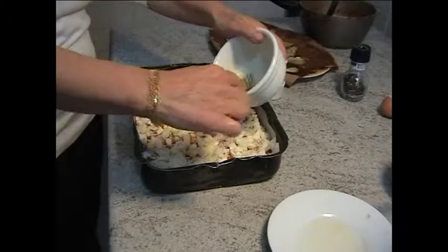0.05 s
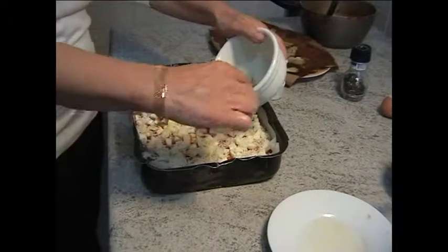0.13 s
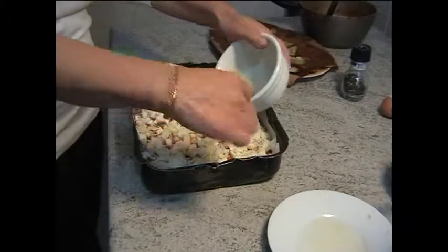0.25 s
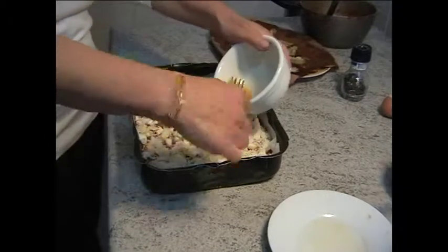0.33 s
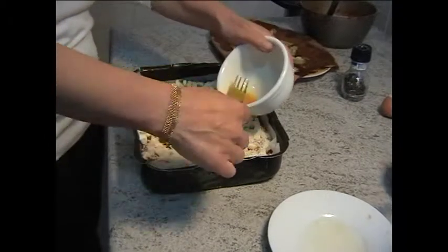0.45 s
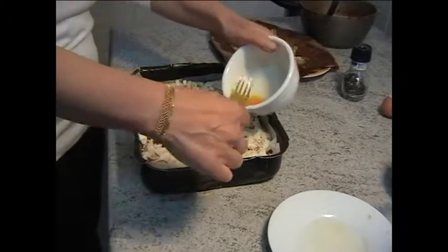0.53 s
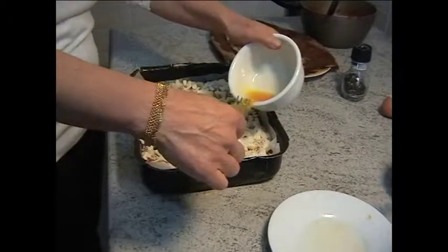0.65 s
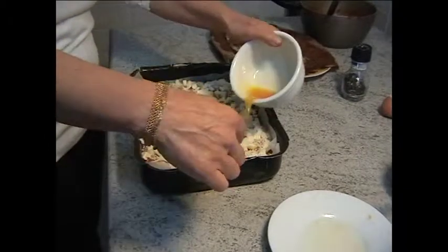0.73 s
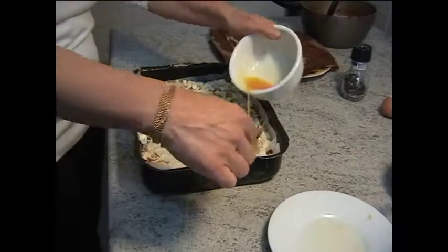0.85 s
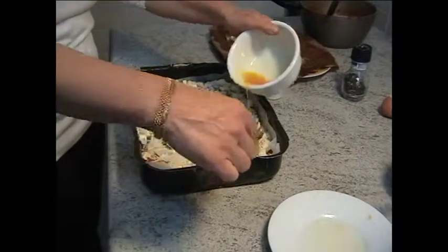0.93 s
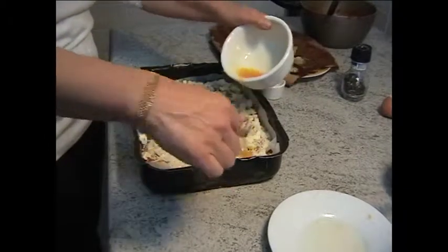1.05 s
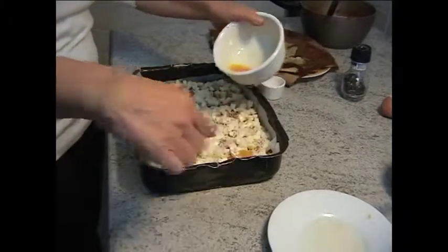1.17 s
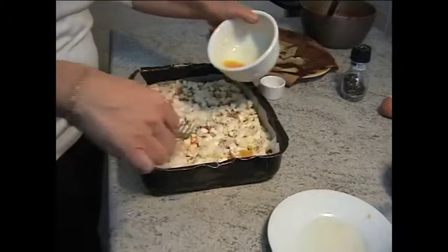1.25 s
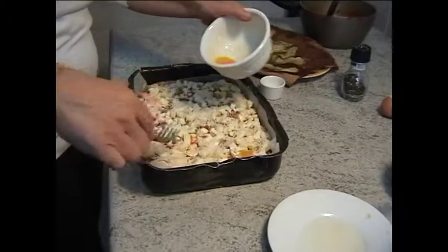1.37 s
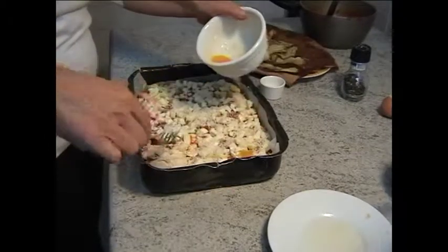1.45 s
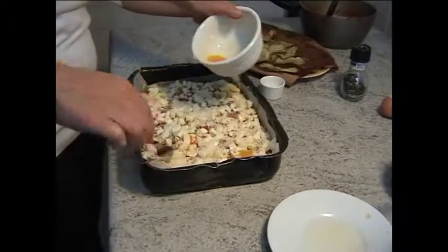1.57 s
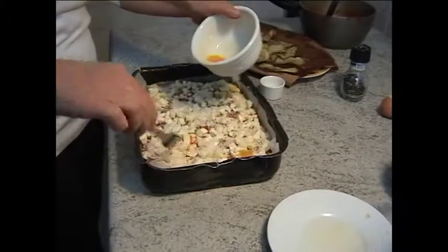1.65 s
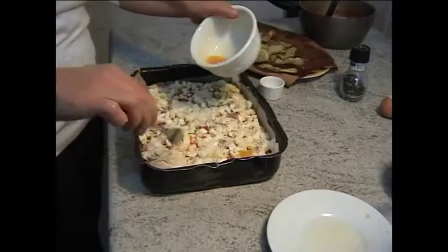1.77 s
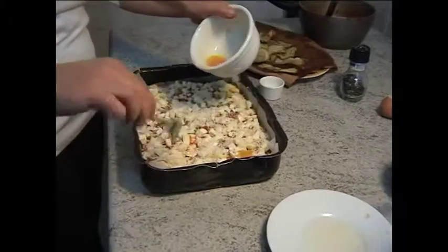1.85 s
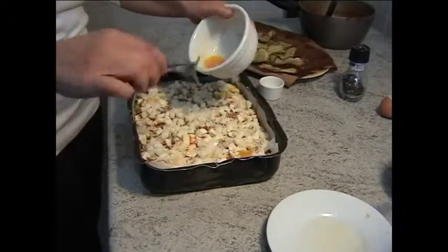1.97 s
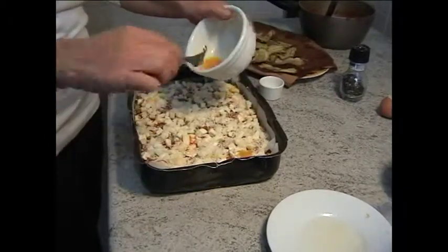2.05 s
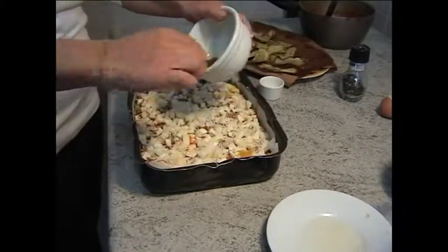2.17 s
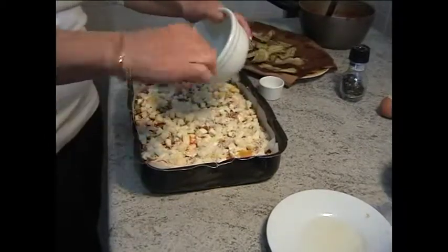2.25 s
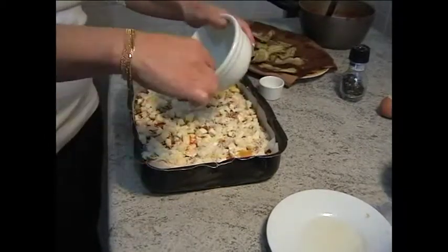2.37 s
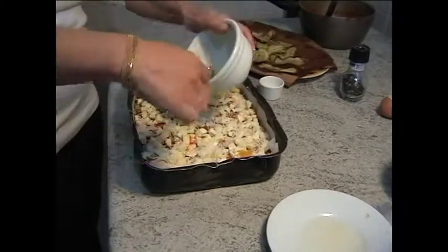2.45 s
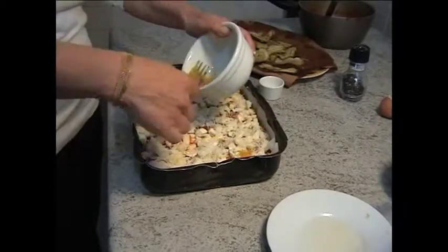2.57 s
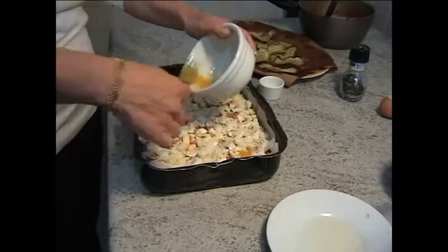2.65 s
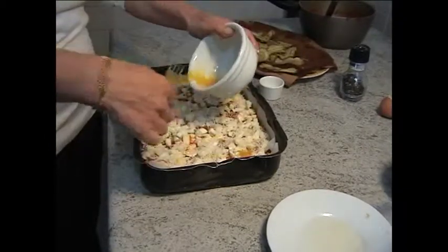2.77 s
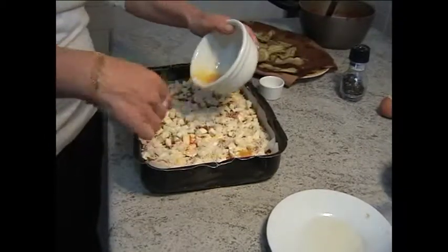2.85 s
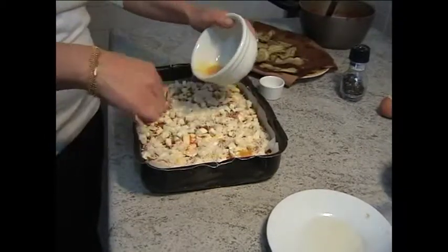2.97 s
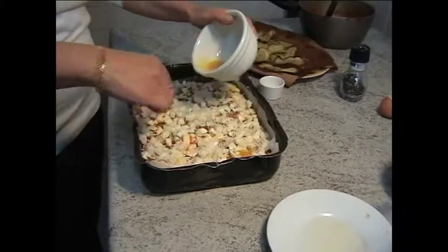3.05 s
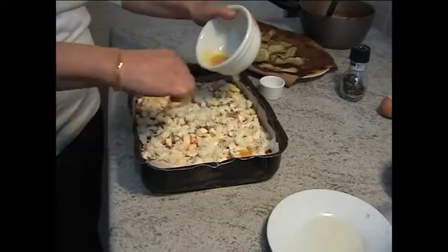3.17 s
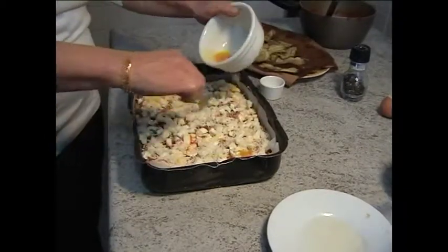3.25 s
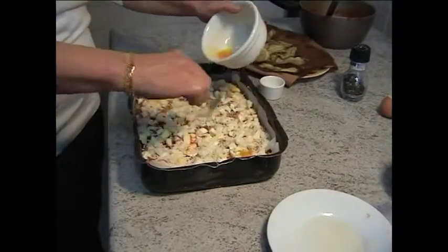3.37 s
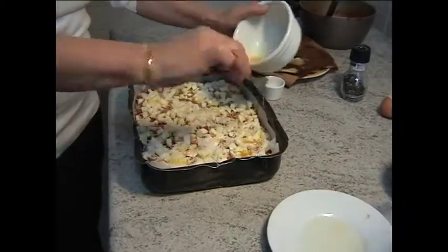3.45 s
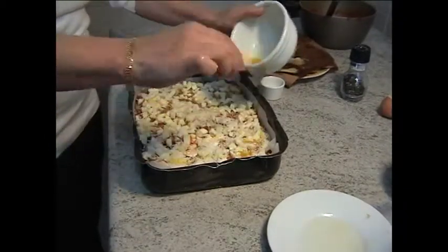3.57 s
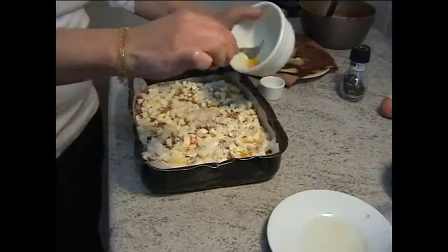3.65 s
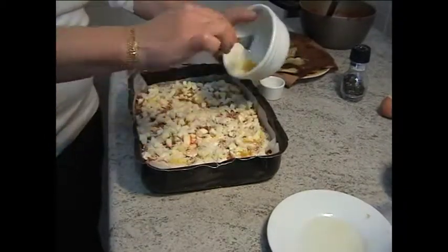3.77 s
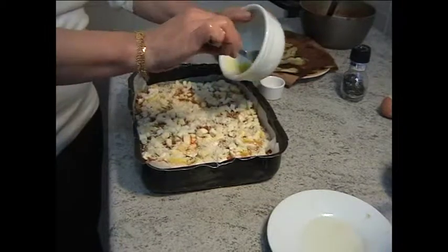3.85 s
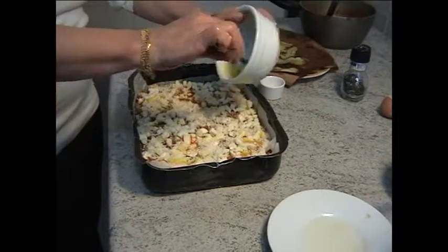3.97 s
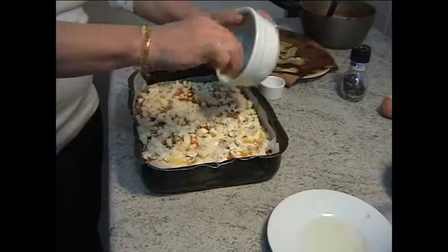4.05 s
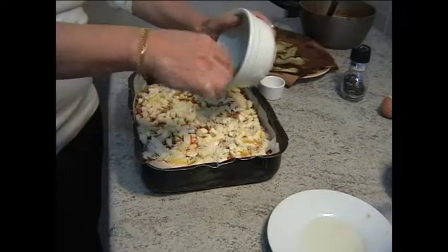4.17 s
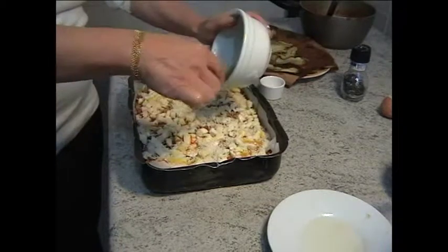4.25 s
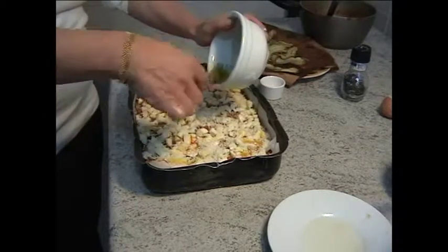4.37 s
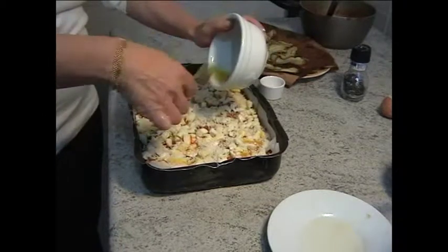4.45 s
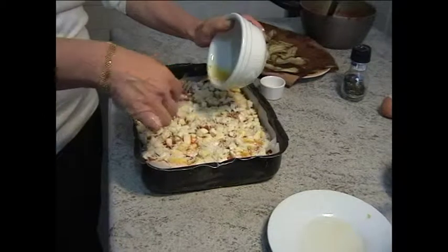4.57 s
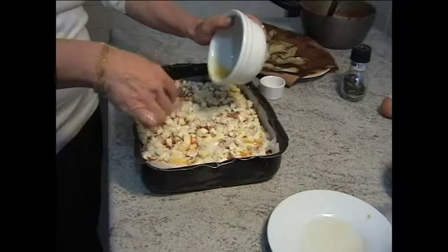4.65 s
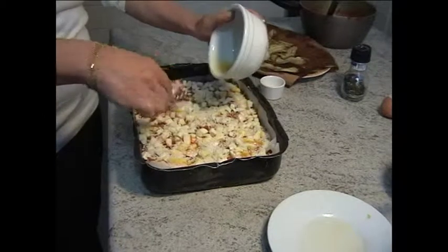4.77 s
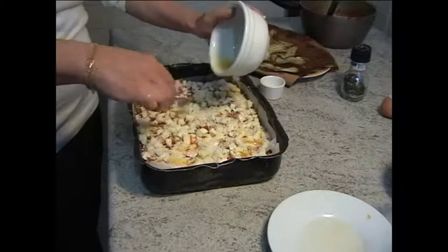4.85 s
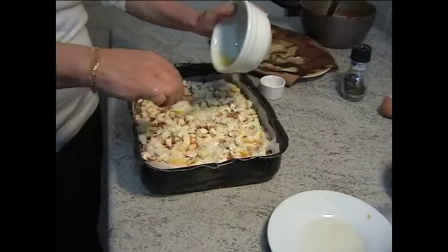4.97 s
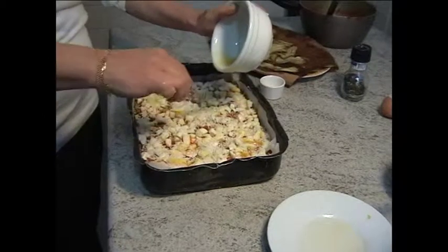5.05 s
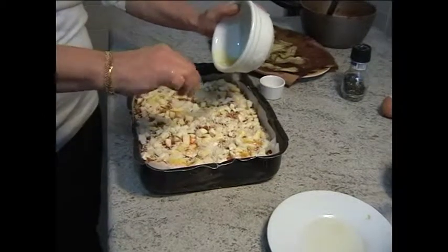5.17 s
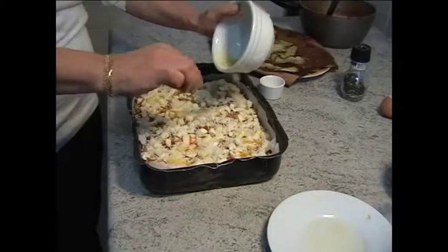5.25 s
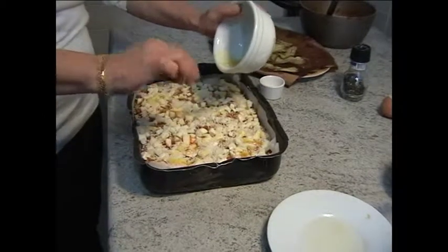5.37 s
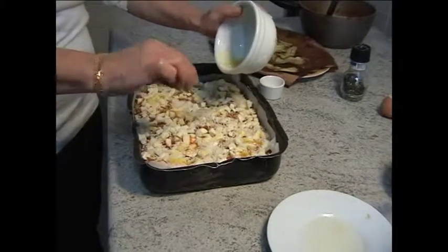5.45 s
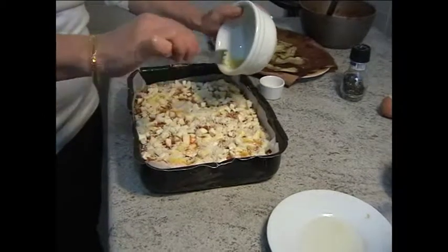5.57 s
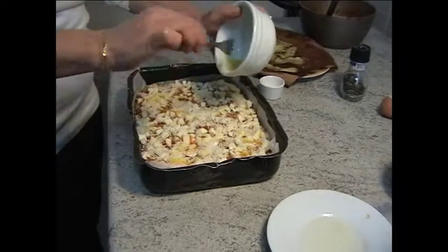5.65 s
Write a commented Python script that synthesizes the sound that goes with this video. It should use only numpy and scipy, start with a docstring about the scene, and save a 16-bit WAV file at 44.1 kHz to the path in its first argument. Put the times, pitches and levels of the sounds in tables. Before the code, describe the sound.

Over a steady fan hum, fork tines scratch, squeak and knock brightly against a hand-held ceramic bowl, with pauses between the bursts.

```python
"""An appliance hums throughout: steady and wavering tones, shaped noise for its fan, a faint high whine.
Over it a steel fork works beaten egg out of a small hand-held ceramic bowl, in three bouts. From the start
the tines scrape (many tiny slips ring the bowl) and squeak (short gliding tones); soon the fork knocks the
bowl (fading modes and a noisy crack). In the second bout egg slops too (narrow puffs of noise).
A small kitchen echoes the bowl by convolution; the level dips briefly once before the third bout."""
import sys
import numpy as np
from scipy import signal
from scipy.fft import rfft, irfft, next_fast_len
from scipy.io import wavfile
from scipy.ndimage import uniform_filter1d, map_coordinates

SR = 44100
rng = np.random.default_rng(int(sys.argv[2]) if len(sys.argv) > 2 else 0)


def generate_wav(signal):
    """Clip the signal to [-1, 1] and save it as 16-bit WAV at the path in sys.argv[1]."""
    frames = np.transpose(np.atleast_2d(signal))
    scaled = np.clip(frames, -1, 1) * 32767
    pcm = np.round(scaled).astype(np.int16)
    wavfile.write(sys.argv[1], SR, pcm)


N = 251811

# Levels here come before the echoes and the microphone.
# Tones of the appliance: pitch_hz, level_db (rms), waver_share (0-1)
HUM_TONES = [(99.95, -49, 0.01), (130.2, -58.5, 0.06), (200.2, -56.5, 0.13), (230.3, -54.5, 0.14),
             (331.3, -62.5, 0), (390.5, -67.5, 0.2), (418, -72.5, 0.3), (478, -72.5, 0.8), (488, -66.5, 0),
             (529, -71, 0.4), (806, -75, 1), (1140, -73, 0.95)]
# Rushing air of the fan: pitch_hz, relative_level_db
AIR_SPECTRUM = [(330, -24.5), (560, 1.5), (795, 1), (902, -2), (1150, 1.5), (1520, -3.5), (1980, -5.5),
                (2370, -8), (11600, -25), (12400, -32.5), (16000, -43)]
# Low rumble of the fan: pitch_hz, relative_level_db
RUMBLE_SPECTRUM = [(20, -31), (45, -2), (80, 5.5), (130, 9), (165, 6.5), (240, 17.5), (300, 7.5),
                   (500, 13.5), (600, -18), (900, -23.5)]
# How alike the fan noise is on left and right: pitch_hz, likeness (0-1)
AIR_LIKENESS = [(60, 1), (150, 1.0), (380, 0.98), (950, 0.84), (2380, 0.74), (5980, 0.27), (15000, 0.21)]
# Strong modes of bowl and fork together: pitch_hz, relative_level_db,
# fade_s (time to fall 60 dB, before the hold of a contact scales it)
BOWL_MODES = [(1346, 1, 0.0027), (1855, -9.5, 0.041), (1928, -7, 0.049), (2029, -10.5, 0.2),
              (2135, -6, 0.11), (2412, -12, 0.068), (2669, -10.5, 0.07), (2840, -20.5, .04),
              (4600, -15, 0.091), (4820, -16.5, 0.16), (5198, -4, 0.23), (5254, -2.5, 0.24),
              (5390, -10, 0.075), (5754, -9.5, 0.048), (6290, -16.5, 0.027), (7470, -15, 0.028),
              (7770, -13, 0.13), (8090, -21.5, 0.094), (8780, -14, .1), (9460, -8, 0.089),
              (9400, -10, 0.088), (10200, -10.5, .11), (10500, -9.5, 0.064), (11700, -9, 0.054)]
# Many short-lived modes crowd round the strong ones: pitch_hz, relative_level_db
CRACK_SPECTRUM = [(400, -22), (850, 5), (1300, 0), (1600, -5.5), (2050, -1.5), (2600, -2.5), (3350, -9),
                  (4200, -4), (4700, -2), (5300, 6), (6600, -4), (9000, -2), (12000, -13), (16000, -8.5)]
# The tines drag over the glaze, one row a stroke: peak_s (most pressure), length_s, level_db,
# lowest_hz (lowest pitch driven), brightness_db (per octave), favoured_hz, favour_db,
# favour_width (share of that pitch), harsh_db
STROKES = [ (0, 0.13, -45, 2430, -2, 8800, 5, 0.065, 4), (0.16, 0.14, -61, 1710, -14, 2870, 17, .07, 10),
           (0.227, 0.058, -54, 2400, -14, 5300, -11, .07, -4),
           (0.265, 0.096, -49, 1660, 10, 1990, 22, 0.077, 5),
           (0.324, 0.19, -54.5, 1500, 6, 3600, 10, 0.23, 13),
           (0.361, 0.056, -45, 1450, -10, 3700, 15, 0.13, 6),
           (0.44, 0.051, -45, 1400, -15, 2120, 10, .16, 12), (0.514, 0.1, -54, 1700, 4, 2000, 7, .1, 2),
           (0.611, 0.082, -40.5, 2040, -6.5, 2140, 0, 0.18, -1),
           (2.232, 0.12, -42.5, 1900, 0, 4200, 3, .3, 10.5),
           (2.343, 0.19, -43, 1900, -2, 3000, 0, 0.34, 9.5),
           (2.489, 0.21, -46, 1790, -2.5, 2420, 2, .25, 4), (2.621, 0.2, -53.5, 1990, 3.5, 2800, 6, .2, 8),
           (2.721, 0.066, -51.5, 1900, -1.5, 2200, 8, .2, 1), (2.737, 0.083, -43, 1895, 2, 1910, 18, .1, 7),
           (2.76, 0.053, -43, 1950, 4, 2100, -1, 0.27, 0), (2.77, .035, -42, 3780, -34, 5170, -1, 0.088, 8),
           (3.941, 0.13, -37, 3000, 5.5, 5300, 5.5, .09, 2),
           (4.118, 0.14, -44.5, 2980, 1.5, 5590, 19, 0.063, -8),
           (4.217, 0.063, -42, 3800, -4, 5830, 18, 0.057, -12),
           (4.251, 0.15, -52, 2000, 1, 1960, 10, 0.076, -1),
           (4.364, .03, -45.5, 3000, -1, 3900, 8, 0.071, 9),
           (4.365, 0.14, -48.5, 2330, 3.5, 9500, 2.5, .07, 2),
           (4.471, 0.14, -45.5, 1900, 8, 2240, 17, .1, 2), (4.501, 0.029, -37, 3600, 0, 6960, 12, .06, -2),
           (4.533, 0.063, -43, 3400, -6, 5200, 8, 0.11, -5),
           (4.536, 0.063, -44.5, 2290, 6, 8300, 0, .05, 3)]
# The film of egg softens each slip: pitch_hz, gain_db
WET_FILM = [(500, 7.5), (9500, -3), (12500, -4.5), (16000, -7)]
# A tine sings on the glaze, one row a squeak: start_s, length_s, pitch_hz, level_db,
# glide (share by which the pitch rises), roughness (0 is smooth, about 1 is very rough)
SQUEAKS = [ (0, 0.044, 2144, -56, -0.015, 0.4), (.005, .054, 3350, -59, -0.014, 0),
           (0.257, 0.02, 1880, -54, -0.069, 1), (.302, 0.071, 3110, -58.5, -0.021, .9),
           (0.583, 0.055, 2830, -50, 0.036, 0.8), (.585, 0.052, 2154, -49, -0.016, .4),
           (2.317, 0.01, 2650, -36, 0.048, .8), (2.319, 0.053, 2072, -46, 0, 0.8),
           (2.343, 0.042, 2750, -58, 0.059, 1), (2.431, 0.025, 2800, -50, -0.0036, .8),
           (2.477, 0.012, 2500, -57, .02, .8), (2.519, .032, 2200, -54, 0.036, .8),
           (2.57, .018, 2320, -56, 0.028, .8), (2.573, 0.11, 1895, -64.5, -0.061, 0.7),
           (2.582, 0.045, 3000, -64, 0.022, 1.16), (2.621, 0.027, 2850, -56.5, -0.03, .9),
           (2.652, 0.076, 2815, -62.5, -0.02, .8), (2.753, 0.021, 2096, -47, 0.0057, .8),
           (4.08, 0.086, 3920, -61, 0.000097, 0.45), (4.127, 0.025, 5360, -45, 0.013, .9),
           (4.195, 0.022, 6380, -48.5, -.02, .5), (4.207, 0.038, 1936, -59, -.02, 0.7),
           (4.236, 0.072, 2010, -51.5, 0.012, 0), (4.33, 0.055, 1946, -53.5, -0.078, 0.65),
           (4.47, 0.031, 1975, -43.5, -0.022, .4), (4.52, 0.042, 2000, -57, 0.054, 0.8),
           (4.526, 0.015, 5060, -47, 0.035, .9), (4.53, 0.023, 8650, -47, -.02, 1.1)]
# How long the kitchen's tail lasts: pitch_hz, fade_s (time to fall 60 dB)
KITCHEN_FADE = [(500, 0.33), (2000, 0.59), (5000, 0.4), (9000, 0.35), (15000, 0.26)]
# How alike the echoes are on left and right: pitch_hz, likeness (0-1)
ECHO_LIKENESS = [(500, 0.95), (2000, 0.93), (5000, 0.2), (9000, 0.49), (15000, .3)]
# The fork knocks the bowl, one row a knock: start_s, level_db, lowest_hz (lowest pitch driven),
# brightness_db (per octave), favoured_hz, favour_db, favour_width (share of that pitch), harsh_db,
# hold (factor on the ring time: low when the fork stays pressed on)
CLINKS = [ (0.107, -55.5, 3200, -5, 10800, 11, .07, 7, 0.52),
          (0.2333, -34, 2110, -6.5, 4050, 13.5, 0.054, 3.5, 0.19),
          (.285, -32.5, 2020, -6.5, 2590, 9, 0.052, -1, 0.14),
          (0.3186, -47, 3000, -9, 5300, 7, 0.12, -6, 0.17),
          (0.3579, -51, 1300, -20, 1600, 23, 0.18, 8, 0.26), (.424, -40, 1700, -5, 2280, 3, 0.095, -1, 0.2),
          (.4495, -50, 1720, -8, 2070, 19, 0.083, -5, .25),
          (0.4719, -34, 1400, -8.5, 1710, 7, 0.38, 4, 0.22),
          (0.576, -33.5, 2100, -4.5, 7580, 11, 0.043, 1, 0.34),
          (.591, -50, 3400, -4, 5940, 18, .07, -3, 0.18),
          (0.7308, -34.5, 3380, 2, 7500, 9.5, 0.066, 7, 0.57),
          (2.204, -20, 1750, 1.5, 6500, 6.5, 0.12, 7.5, 1),
          (2.305, -22.5, 2400, -3, 9550, 13, 0.037, -3.5, 0.13),
          (2.311, -32.5, 2100, -4, 2780, 12, 0.38, -4, 0.14),
          (2.322, -40, 2300, -6, 3400, -2, .3, -10, .15), (2.374, -32, 2300, 0.5, 6700, 11, .1, 8, 0.79),
          (2.381, -38.5, 1400, -10, 1700, 20, 0.17, -3, 0.45),
          (2.394, -46, 3400, -6, 5200, 6, .08, -2, 0.17), (2.407, -51, 3000, -6, 5200, -3, .08, -2, 0.23),
          (2.43, -29.5, 2100, 1, 4900, 6, 0.025, 8.5, 0.47), (2.467, -43, 2800, -4, 5100, 6, .08, 2, .18),
          (2.505, -52, 3000, -5, 5200, 5, .08, -3, .18), (2.758, -50, 3210, -2, 5700, 6, .1, 7, 0.14),
          (2.767, -47.5, 3200, -3, 5600, -1, .1, -5, .15), (2.779, -43.5, 2400, 5, 5200, 2.5, .07, 2, 0.42),
          (3.9153, -19, 2010, -3, 7680, 11.5, 0.043, -6, 0.4),
          (3.961, -32.5, 2600, -10, 5170, 9.5, .07, -10, 0.38),
          (3.971, -33, 3800, -11, 5200, 12, .07, -16, 0.3),
          (3.9955, -31.5, 3200, 5.5, 5220, 19, 0.066, 8, 0.29),
          (4.0408, -36, 3550, -1, 5500, 10, 0.085, 0, 0.18),
          (4.201, -46.5, 3900, -24, 5700, -1, .1, -14, 0.34),
          (4.362, -51, 1980, 10, 3860, 15, .08, 3, 0.62), (4.44, -32.5, 2110, -8, 1880, 5, 0.057, -6, 0.39),
          (4.459, -43, 2206, -13, 5200, 6, .07, -1, 0.39), (4.537, -50, 3400, 2, 5300, 4, .1, -4, 0.17)]
# The fork meets the bowl at another place in each bout, so its middle modes change: time_s, gain_db
MIDDLE_LEVEL = [(.7, 1), (2.2, 0.5), (2.8, -1.5), (3.9, -4)]
# The egg slops under the fork: start_s, length_s, pitch_hz, level_db
SLOPS = [(2.314, 0.032, 532, -56), (2.315, 0.03, 830, -55.5), (2.361, 0.062, 758, -60.5)]
# The two microphone ports: pitch_hz, left_minus_right_db
PORT_BALANCE = [(500, -2), (2200, 0), (5200, -0.2), (9000, 1), (13000, 1)]
# Colour of the microphone: pitch_hz, gain_db
MICROPHONE = [(20, 2.5), (11500, 0), (12600, 0), (13600, -5), (16000, -20)]
# The brief dip in level: start_s, end_s
DIP = (3.4427, 3.4597)

AIR_DB = -60.5
# A tine chatters longer after a harder, harsher knock. CHATTER_S is for a usual knock of harshness 0;
# each doubling takes this many more dB of level or of harshness.
CHATTER_S, USUAL_KNOCK_DB, DOUBLING_DB, HARSH_DOUBLING_DB = 0.0045, -39.5, 19.5, 29
FLUTTER = .5  # most that the rattle of a pressed tine makes the ring flutter, as a share
PRESS_SHARE = .27  # of a stroke in which the pressure builds; it eases off over the rest
# A contact drives little below its lowest pitch; its hardness tilts the treble above TREBLE_HZ
LOW_SLOPE_DB, TREBLE_HZ = 20, 4930  # dB per octave, Hz
MIDDLE_HZ, MIDDLE_WIDTH = 2716, 0.11  # centre of the middle modes, and width as a share of it
# As a tine travels over the glaze the pitches that it drives wander
SLIDE, SLIDE_HZ = .018, 22  # share of the pitch (rms), speed in Hz
SLIP_SPREAD_DB = 3.5  # how unequal the slips are
PEAK_CEILING = .52  # level that rounded peaks approach
EDGE_HZ = 16500  # top of the band


def amp(db):
    """Turns decibels into a plain factor."""
    return 10 ** (np.asarray(db) / 20)


def evened(x):
    """Scales a sound to an rms of 1."""
    return x / np.sqrt(np.mean(x ** 2) + 1e-20)


def read(points, hz):
    """Reads a curve joined by straight lines on a log-frequency axis."""
    f, value = np.transpose(points)
    return np.interp(np.log(hz + 1), np.log(f + 1), value)


def add(mix, s, sound):
    """Adds a sound to the mix at a time in seconds, cut off at the end."""
    part = mix[..., max(round(s * SR), 0):][..., :sound.shape[-1]]
    part += sound[..., :part.shape[-1]]


def drift(rate_hz):
    """Slow random complex curve of rms 1, with little motion faster than the rate."""
    hz = np.fft.fftfreq(N, 1 / SR)
    random_phases = np.exp(2j * np.pi * rng.random(N))
    z = np.fft.ifft(random_phases / (1 + (hz / rate_hz) ** 4))
    return z / np.std(z)


def pair(left, other, same):
    """Mixes two independent signals into two channels of a given likeness."""
    same = np.clip(same, -1, 1)
    mid = np.sqrt((1 + same) / 2) * left
    side = np.sqrt((1 - same) / 2) * other
    return np.array([mid + side, mid - side])


def coloured(x, shape_db):
    """Filters a sound by a curve of gains over pitch."""
    size = next_fast_len(x.shape[-1] + 1024)
    gain = amp(read(shape_db, np.fft.rfftfreq(size, 1 / SR)))
    return irfft(rfft(x, size) * gain, size)[..., :x.shape[-1]]


def hum(waver_hz=5):
    """Mains tones and the fan's rotation tones, each partly steady and partly wavering."""
    t, out = np.arange(N) / SR, np.zeros(N)
    for hz, db, waver in HUM_TONES:
        waver = np.clip(waver, 0, 1)
        size = np.sqrt(1 - waver ** 2) + waver * drift(waver_hz)
        tone = (size * np.exp(2j * np.pi * (hz * t + rng.random()))).real
        out += amp(db) * evened(tone)
    return out


def noise(shape_db):
    """Steady noise of a given spectrum at both microphone ports, at an rms of 1."""
    hz = np.fft.rfftfreq(N, 1 / SR)
    z = pair(*rfft(rng.standard_normal((2, N))), read(AIR_LIKENESS, hz))
    return evened(irfft(z * amp(read(shape_db, hz)), N))


def fan(rumble_db=-56, whine_db=-86, whine_hz=12400, whine_width_hz=60):
    """Rushing air and low rumble are shaped noise; the faint whine is a narrow, unsteady tone."""
    carrier = np.exp(2j * np.pi * whine_hz * np.arange(N) / SR)
    whine = (drift(whine_width_hz) * carrier).real
    air = amp(AIR_DB) * noise(AIR_SPECTRUM)
    rumble = amp(rumble_db) * noise(RUMBLE_SPECTRUM)
    return air + rumble + amp(whine_db) * evened(whine)


def ring(hold, favoured_hz, favour_db, favour_width, harsh_db, chatter, crack_db=-7, crack_t60=0.052,
         tick_db=1, uneven_db=3, detune=0.0036, wander=.007, port_turn=0.27, crack_same=0.93,
         rise=0.11, size=SR // 4):
    """One contact: a brief chatter (s) pumps up fading modes and a crack; its shifting load makes them waver."""
    t = np.arange(size) / SR
    hz, db, t60 = np.transpose(BOWL_MODES)[:, :, None]
    luck, shift, turn, lag = rng.standard_normal((4, len(hz), 1))

    def favour(f):
        """Gain near the pitch that this contact favours."""
        return amp(favour_db * np.exp(-(np.log((f + 1) / favoured_hz) / favour_width) ** 2))

    load = evened(uniform_filter1d(rng.random((len(hz), size)) - .5, size=300, axis=1))
    cycles = np.cumsum(hz * (1 + detune * shift + wander * load), axis=1) / SR
    fade = np.log(1000) * t / (t60 * max(hold, .1))  # log(1000) is a fall of 60 dB
    waves = favour(hz) * amp(db + uneven_db * luck) * np.exp(2j * np.pi * (cycles + turn) - fade)

    rattle = uniform_filter1d(np.exp(2j * np.pi * rng.random(waves.shape)), size=170, axis=1)
    flutter = FLUTTER * np.clip(1 - hold, 0, 1)
    waves = waves * (np.sqrt(1 - flutter ** 2) + flutter * rattle / np.std(rattle))
    apart = port_turn * np.sign(lag) * hz / np.mean(hz)  # short waves reach the two ports out of step
    modes = np.array([(waves * np.exp(1j * side * apart)).sum(0).real for side in (-1, 1)])

    bins = np.fft.rfftfreq(len(t), 1 / SR)
    crack = rfft(pair(*rng.standard_normal((2, len(t))), crack_same))
    crack = irfft(crack * amp(read(CRACK_SPECTRUM, bins)) * favour(bins), len(t))
    tick = amp(tick_db) * np.exp(-(t / chatter) ** 2)
    crack *= amp(crack_db - 60 * t / crack_t60) + tick
    onset = 1 - np.exp(-t / (rise * chatter))
    return (modes + amp(harsh_db) * crack) * onset


def driven(x, lowest_hz, brightness_db):
    """Where and how hard the fork touches decides how deep and how bright the bowl answers."""
    hz = np.geomspace(100, SR / 2, 80)
    depth_db = -10 * np.log10(1 + amp(LOW_SLOPE_DB * np.log2(lowest_hz / hz)) ** 2)
    treble_db = brightness_db * np.maximum(np.log2(hz / TREBLE_HZ), 0)
    return coloured(x, np.transpose([hz, depth_db + treble_db]))


def sliding(x, travel):
    """Bends every pitch of a sound along a slow curve, by reading it faster or slower."""
    place = np.arange(len(travel)) + np.cumsum(SLIDE * travel)
    return np.array([map_coordinates(channel, [place], order=3) for channel in x])


def scrapes(level_db=0, slips_per_s=900, pressed=0.16, chatter=0.002, judder_db=0.5, judder_hz=45,
            pulled=0.01014, count=3):
    """Tines stick and slip under a juddering hand; each rings the bowl its own way, damped and bent in pitch."""
    out = np.zeros((2, N))
    judder = amp(judder_db * evened(drift(judder_hz).real))
    travel = evened(drift(SLIDE_HZ).real)
    for (peak, length, db, lowest_hz, brightness_db,
         favoured_hz, favour_db, favour_width, harsh_db) in STROKES:
        start = peak - np.clip(PRESS_SHARE, 0, 1) * length
        t = max(start, 0) + np.arange(SR // 3) / SR
        now = int(t[0] * SR) + np.arange(len(t))

        chance, sign, size = rng.random((3, count, len(t)))
        happens = chance < slips_per_s / count / SR  # the tines share the slips
        strength = amp(SLIP_SPREAD_DB * np.minimum(-np.log(size), 2))
        slips = happens * np.sign(sign - .5) * strength
        slips = coloured(slips * judder[now], WET_FILM)

        rub = np.zeros(1)
        for tine in slips:
            answer = ring(pressed, favoured_hz, favour_db, favour_width, harsh_db, chatter,
                          detune=pulled, size=SR // 21)
            rub = rub + signal.fftconvolve(tine[None], answer, axes=1)

        pressure = np.interp(t, [start, peak, start + length], [0, 1, 0])
        sound = pressure * driven(sliding(rub, travel[now]), lowest_hz, brightness_db)
        # the level is that of the stroke at full pressure, so it is scaled by the rms pressure
        add(out, t[0], amp(db + level_db) * evened(sound) * np.sqrt(np.mean(pressure ** 2)))
    return out


def squeaks(wobble=.015):
    """For a moment the slips lock into a thin, rough tone that slides with the speed of the tine."""
    out, unsteady, grit = np.zeros(N), drift(150).real, drift(110)
    for s, length, hz, db, glide, rough in SQUEAKS:
        count, first = int(length * SR), max(int(s * SR), 0)
        bend = wobble * rough * unsteady[first:][:count] + glide * np.linspace(-.5, .5, count)
        cycles = np.cumsum(hz * (1 + bend)) / SR
        tone = ((1 + rough * grit[first:][:count]) * np.exp(2j * np.pi * cycles)).real
        add(out, s, amp(db) * evened(tone * signal.windows.tukey(count, .7)))
    return out


def kitchen(x, near_db=-10, near_t60=0.2, tail_db=-8):
    """First echoes from the worktop and dishes, then a noisy tail that fades at its own rate at each pitch."""
    t = np.arange(SR * 2 // 3) / SR
    hz, when, z = signal.stft(rng.standard_normal((2, len(t))), SR, nperseg=256)
    fading = z * amp(-60 * when / read(KITCHEN_FADE, hz)[:, None])
    tail = signal.istft(fading, SR, nperseg=256)[1][:, :len(t)]
    tail *= np.clip((t - .004) / 0.0053, 0, 1)  # the tail sets in after 4 ms

    taps = rng.standard_normal((2, len(t))) * (rng.random(len(t)) < 900 / SR)
    near = taps * (t > .002) * amp(-60 * t / near_t60)
    echo = rfft(amp(near_db) * evened(near) + amp(tail_db) * evened(tail))
    echo = irfft(pair(*echo, read(ECHO_LIKENESS, np.fft.rfftfreq(len(t), 1 / SR))), len(t))
    return signal.fftconvolve(x, echo / np.sqrt(len(t)), axes=1)[:, :N]


def moving_echoes(x, count=4):
    """The bowl moves in the hand, so the sound fades round a circle of echo patterns."""
    place = np.arange(N) / SR * 11  # patterns passed, at 11 a second
    out = np.zeros((2, N))
    for k in range(count):
        distance = abs((place - k + count / 2) % count - count / 2)
        out += kitchen(x * np.cos(np.pi / 2 * np.minimum(distance, 1)))
    return out


def clinks(level_db=0):
    """Each knock rings the bowl with its own strength and colour."""
    out, attack = np.zeros((2, N)), SR // 50  # the level is set over the first 20 ms
    for (s, db, lowest_hz, brightness_db,
         favoured_hz, favour_db, favour_width, harsh_db, hold) in CLINKS:
        doublings = (db - USUAL_KNOCK_DB) / DOUBLING_DB + harsh_db / HARSH_DOUBLING_DB
        knock = ring(hold, favoured_hz, favour_db, favour_width, harsh_db, CHATTER_S * 2 ** doublings)
        sound = driven(knock, lowest_hz, brightness_db)
        add(out, s, amp(db + level_db) * sound / np.std(sound[:, :attack]))
    return out


def placed(x):
    """Raises or lowers the middle modes from bout to bout, as the fork meets the bowl elsewhere."""
    hz = np.fft.rfftfreq(N, 1 / SR)
    band = np.exp(-(np.log((hz + 1) / MIDDLE_HZ) / MIDDLE_WIDTH) ** 2)
    middle = irfft(rfft(x) * band, N)
    gain = amp(np.interp(np.arange(N) / SR, *np.transpose(MIDDLE_LEVEL)))
    return x + (gain - 1) * middle


def slops(width_hz=110):
    """Pockets of air in the egg give short, hollow puffs: narrow noise that swells and fades."""
    out, churn = np.zeros(N), drift(width_hz)
    for s, length, hz, db in SLOPS:
        t = np.arange(int(length * SR)) / SR
        puff = (churn[int(s * SR):][:len(t)] * np.exp(2j * np.pi * hz * t)).real
        add(out, s, amp(db) * evened(puff * np.sin(np.pi * t / length)))
    return out


def ports(x):
    """The two microphone ports hear the pitches unequally, each taking half the difference."""
    left_db = [(hz, db / 2) for hz, db in PORT_BALANCE]
    right_db = [(hz, -db / 2) for hz, db in PORT_BALANCE]
    return np.array([coloured(x[0], left_db), coloured(x[1], right_db)])


def scene():
    """The bowl, direct and echoed by the kitchen, over the appliance."""
    bowl = placed(clinks() + scrapes()) + squeaks() + slops()
    return ports(bowl + moving_echoes(bowl)) + hum() + fan()


def record(dry, dip_db=-35):
    """The microphone dulls the top and rounds the loudest peaks; the level dips briefly; then the band limit."""
    t = np.arange(N) / SR
    x = coloured(dry, MICROPHONE)
    x = x / (1 + (x / PEAK_CEILING) ** 6) ** (1 / 6)
    inside = (t > DIP[0]) & (t < DIP[1])
    gain = uniform_filter1d(np.where(inside, amp(dip_db), 1.), size=12)  # softens the edges of the dip
    low_pass = signal.firwin(511, EDGE_HZ, window=("kaiser", 9), fs=SR)
    return signal.oaconvolve(x * gain, low_pass[None], "same")


dry = scene()
out = record(dry)
generate_wav(out)
```